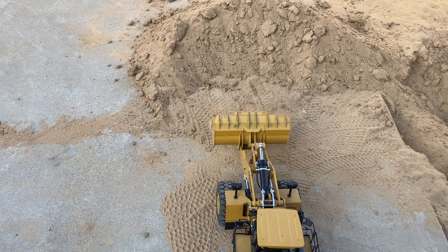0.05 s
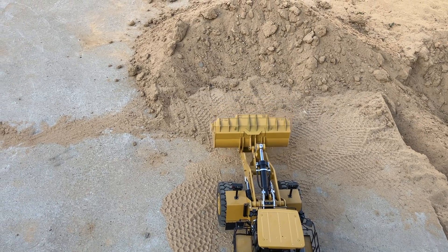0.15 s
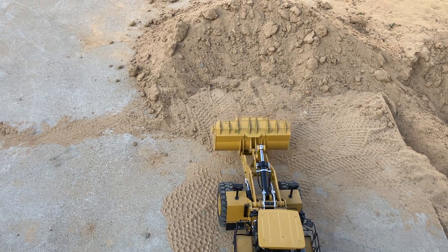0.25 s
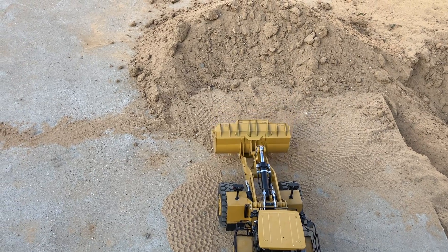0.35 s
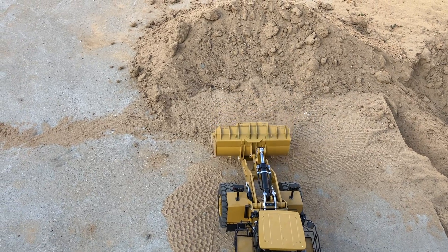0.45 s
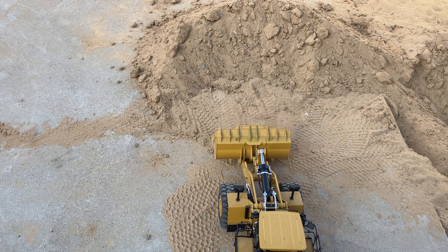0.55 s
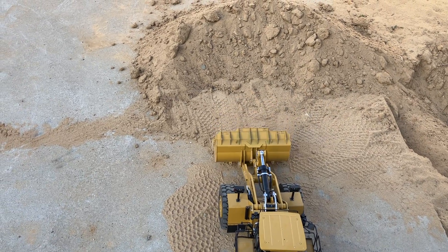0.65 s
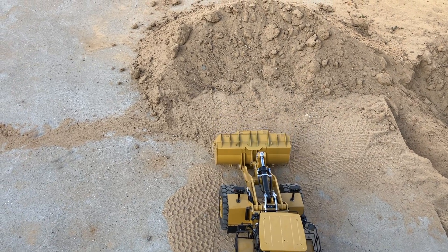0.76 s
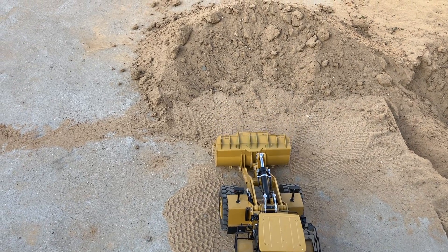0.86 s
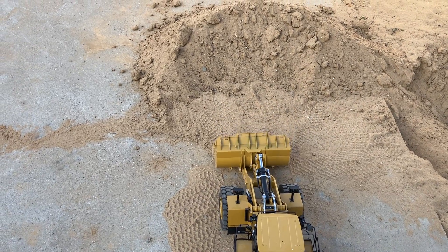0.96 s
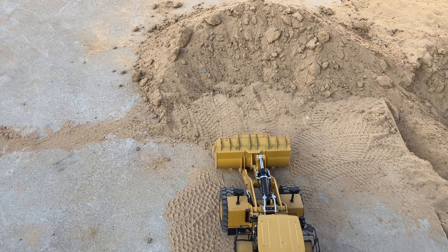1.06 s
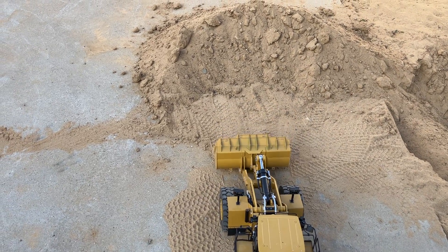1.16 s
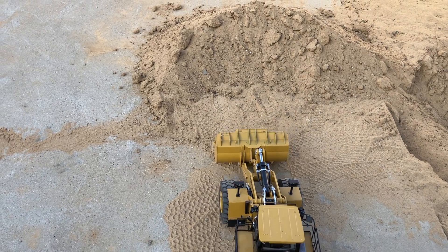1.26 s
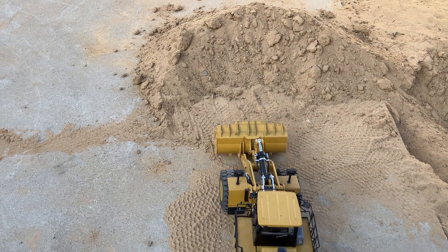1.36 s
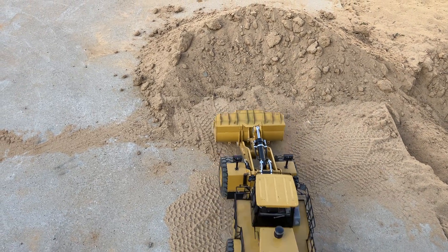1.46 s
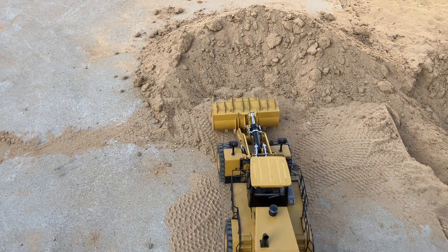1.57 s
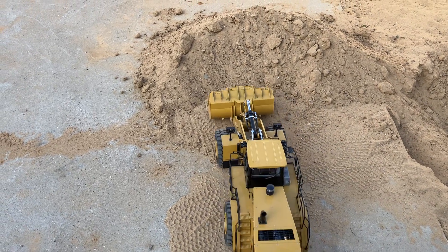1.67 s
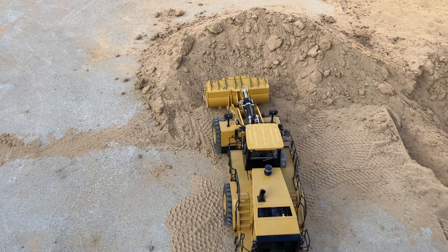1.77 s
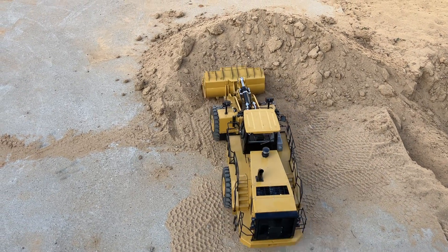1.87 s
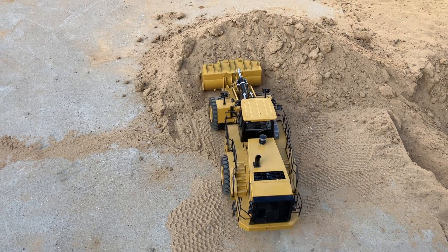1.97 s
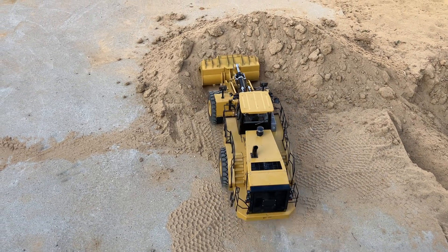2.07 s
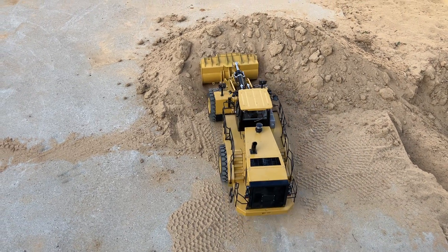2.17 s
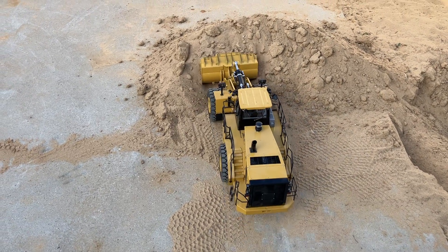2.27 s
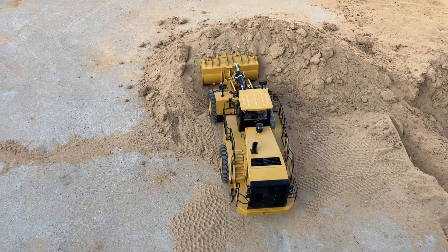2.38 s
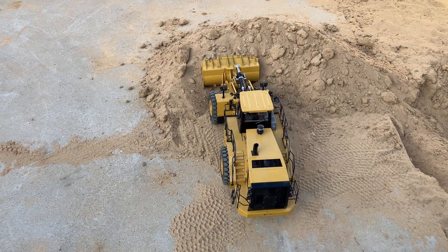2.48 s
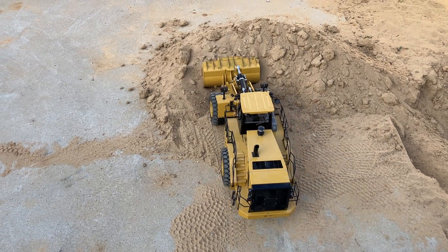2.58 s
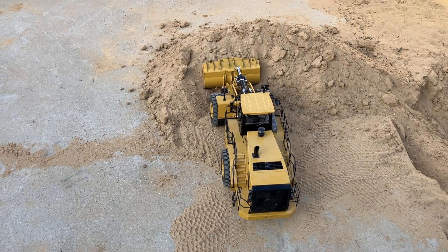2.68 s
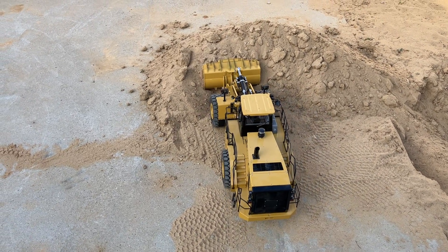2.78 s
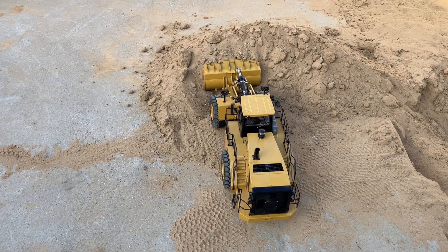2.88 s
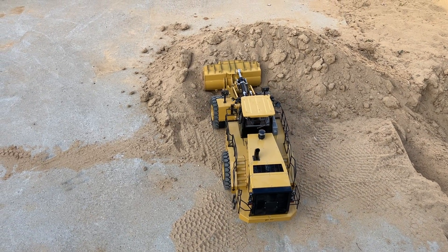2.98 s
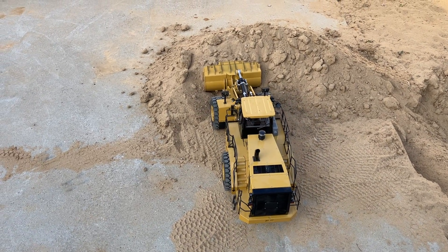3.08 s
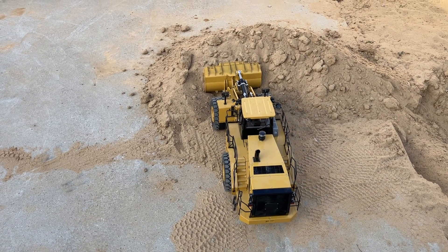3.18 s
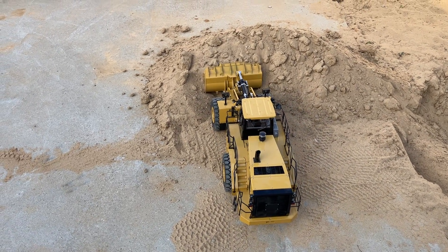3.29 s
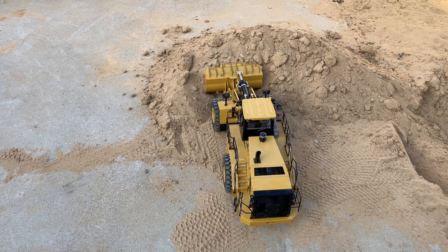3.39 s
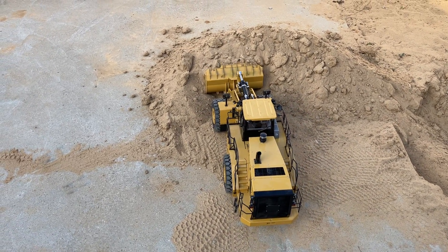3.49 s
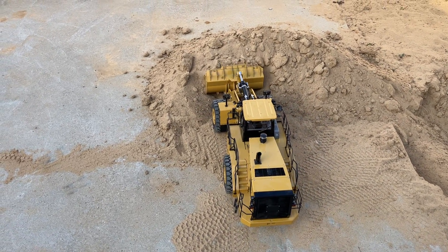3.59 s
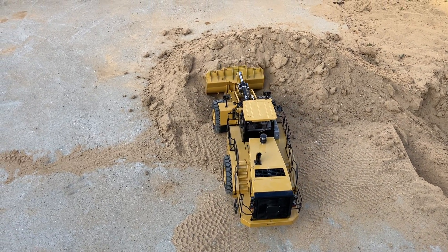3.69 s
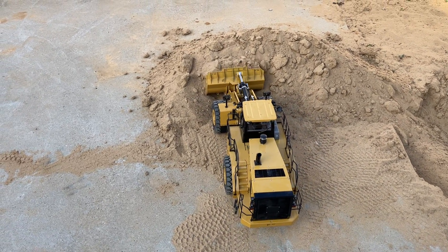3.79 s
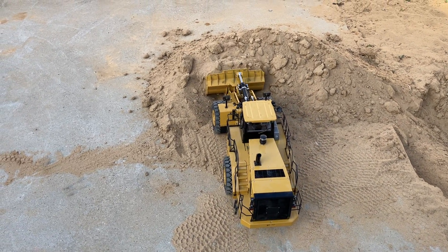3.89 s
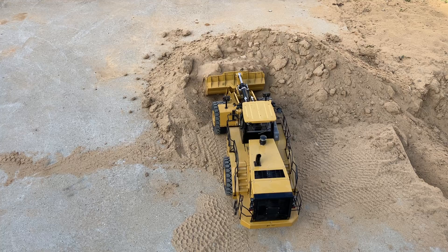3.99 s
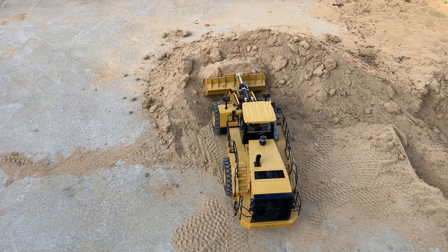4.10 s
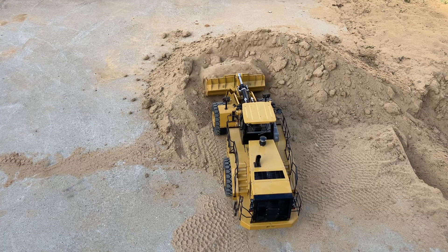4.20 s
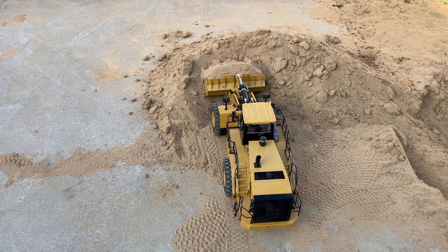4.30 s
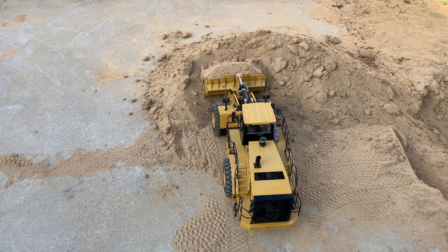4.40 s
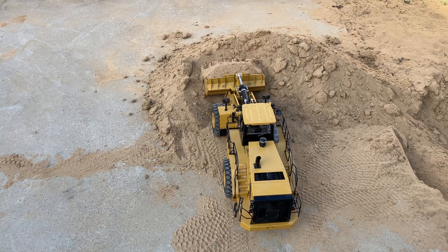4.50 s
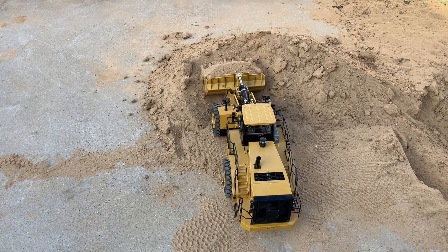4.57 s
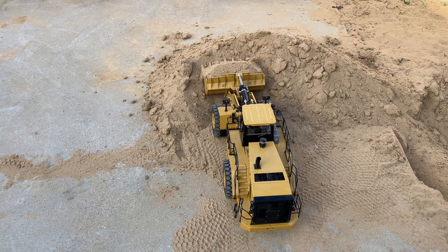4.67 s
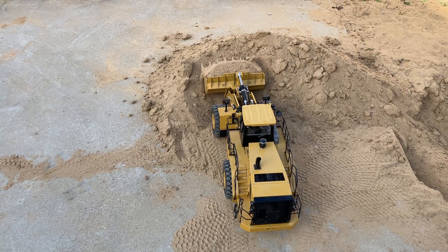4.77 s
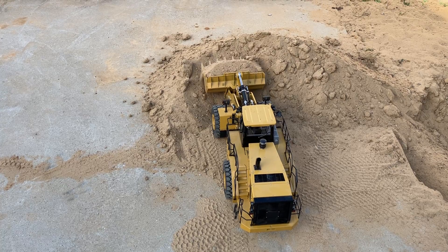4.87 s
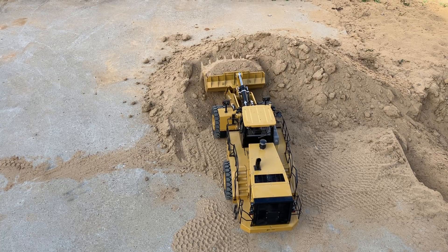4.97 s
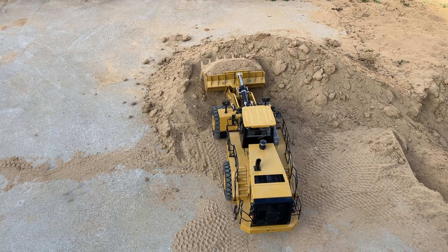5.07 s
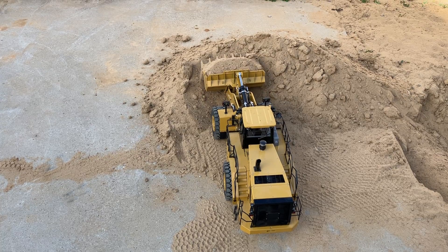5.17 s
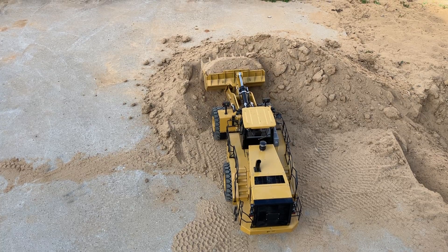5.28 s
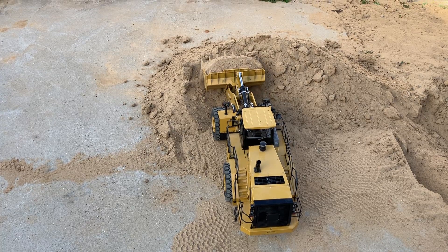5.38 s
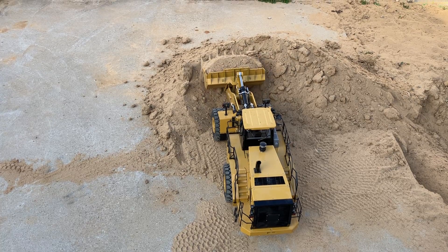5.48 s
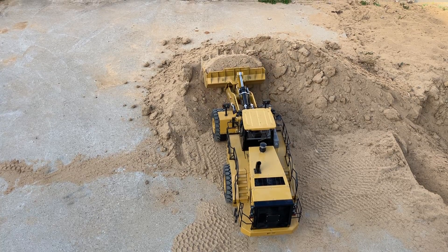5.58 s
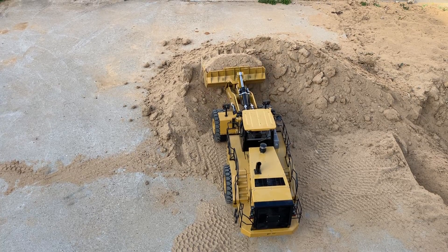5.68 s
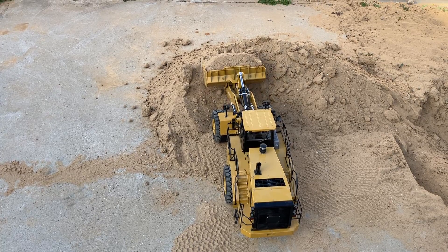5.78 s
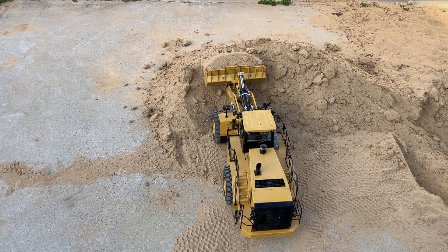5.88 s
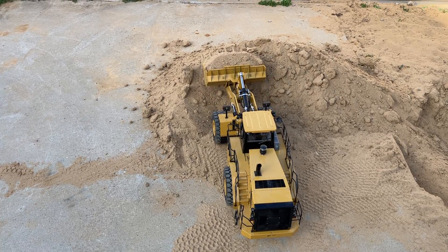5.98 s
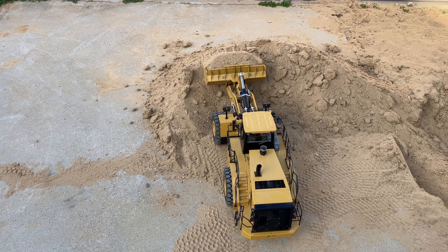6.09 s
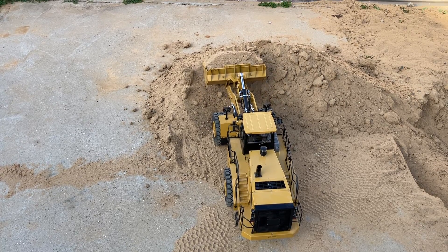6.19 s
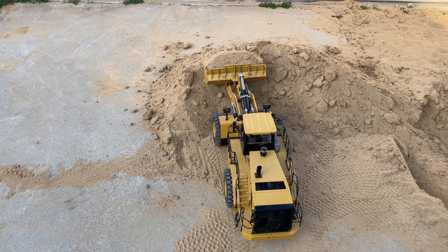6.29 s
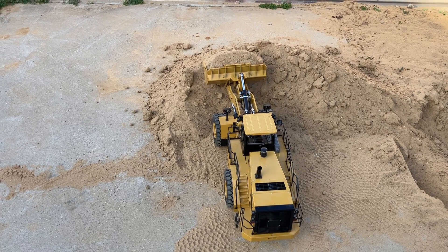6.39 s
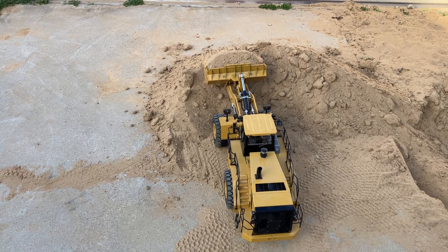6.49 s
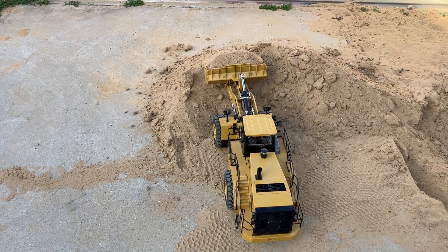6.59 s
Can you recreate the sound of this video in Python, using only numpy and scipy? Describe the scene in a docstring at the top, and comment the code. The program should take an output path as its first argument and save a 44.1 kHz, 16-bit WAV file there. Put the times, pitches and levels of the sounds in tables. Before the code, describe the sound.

A hand-held stereo microphone is close to a small electric loader outdoors. Its buzzy pump whine runs down; a tiny servo twitches. Then comes an abrupt loud burst of grinding gears, gritty tyres and bucket steel scraping and knocking on stones. Near quiet follows, with a servo's thin buzz and a click. The pump starts again, whines strongly, drops, recovers and slows at the end over far traffic rumble.

```python
"""On sandy concrete, close to a hand-held stereo microphone, a model wheel loader works.
Its hydraulic pump motor repeats a pattern of shaft orders through the chassis; it slows, stops, starts again.
The drive motor lurches forward on gear tones and noise, the bucket's steel rings and rasps over the ground,
a small servo whirs, gears click. Far off, shaped noise rumbles as traffic.
The treble differs in phase between left and right. Table levels are relative: filters and trims follow."""
import sys
import numpy as np
from scipy import signal
from scipy.fft import rfft, irfft, next_fast_len
from scipy.io import wavfile
from scipy.ndimage import uniform_filter1d, map_coordinates

SR = 44100
rng = np.random.default_rng(int(sys.argv[2]) if len(sys.argv) > 2 else 0)


def generate_wav(signal):
    """Clip the signal to [-1, 1] and save it as 16-bit WAV at the path in sys.argv[1]."""
    frames = np.transpose(np.atleast_2d(signal))
    scaled = np.clip(frames, -1, 1) * 32767
    pcm = np.round(scaled).astype(np.int16)
    wavfile.write(sys.argv[1], SR, pcm)


N = 293265

# seven magnet pairs, at 35, 42, 49 .. times the shaft speed: level/dB
MAGNET_LEVELS = [-75, -65, -54, -67, -63, -56.5, -68, -65, -61.5, -64.5, -70.5, -75, -62, -68.5, -67, -70.5,
                 -71, -70, -68.5, -97, -82, -84, -80, -74, -78, -71.5, -84]
# nineteen gear teeth, at 38, 57, 76 .. times the shaft speed: level/dB
TOOTH_LEVELS = [-62.5, -65.5, -62.5, -65, -63.5, -67, -87, -89, -81, -94, -89, -78, -89, -112, -74.5, -75.5,
                -77, -75]
# twelve stator slots beating against the magnets: multiple of shaft speed; level/dB
SLOT_ORDERS = [37, 47, 61, 74, 165, 230]
SLOT_LEVELS = [-49, -60, -50.5, -77, -65, -73]
# orders whose strength differs while running down without load: multiple of shaft speed
IDLE_ORDERS = [37, 42, 47, 49, 61, 119, 133, 165]


def revolution(change_db):
    """One turn of the shaft: magnet, tooth and slot orders over weak irregularities at every order."""
    orders, size = 600, 2 ** 14
    level = amp(-81 - .055 * np.arange(orders) + 3 * rng.standard_normal(orders))
    level[np.arange(len(MAGNET_LEVELS)) * 7 + 35] = amp(MAGNET_LEVELS)
    level[np.arange(len(TOOTH_LEVELS)) * 19 + 38] = amp(TOOTH_LEVELS)
    level[SLOT_ORDERS] = amp(SLOT_LEVELS)
    level[IDLE_ORDERS] *= amp(change_db)
    random_phase = np.exp(2j * np.pi * rng.random(orders))
    return irfft(level * random_phase, size) * size / np.sqrt(2)


# pump runs as the throttle stick sets them, one list a run: t/s, shaft speed f/Hz
PUMP_RUNS = [
    [(0, 21.3), (.23, 19.05), (.61, 16.48), (.9, 14.55), (1.08, 13.65)],
    [(2.91, 13.8), (2.97, 14.9), (3.06, 17.7), (3.328, 28.0), (3.69, 28.33), (4.028, 28.0), (4.17, 23.9),
     (4.25, 22.5), (4.38, 18.5), (4.505, 15.7), (4.69, 19.55), (5.32, 21.97), (5.67, 21.95), (5.85, 20.33),
     (6.08, 19.97), (6.27, 19.3), (6.42, 17.5), (6.63, 14.25), (6.65, 14.1)],
]
# change of the idle orders, one row a run: level/dB for each order
IDLE_CHANGES = [
    [-6, -6, 6, 7, 5, 0, 5, -8],
    [0, 0, 0, 0, 0, 0, 0, 0],
]
# one row a run: effort level/dB at cruise, its slope/(dB per Hz), treble level/dB, tick level/dB,
# sizzle level/dB, fade before the stop t/s
RUN_LOADS = [(-3, 0.16, -2, -56, -49.5, 0.14), (0.2, 0.7851, -0.36, -73, -51, .001)]
# chassis resonances around the pump: f/Hz, width f/Hz, level/dB
CHASSIS_MODES = [(843.6, 81, 12.5), (972.5, 213, 5.5), (1186, 130, -1.5), (1325, 160, -2), (1874, 28, 1),
                 (2013.6, 69.4, 15), (2067, 200, 6), (2610, 710, -0.5), (2942, 30, 11), (3520, 940, -3.5),
                 (4630, 530, 4), (5700, 1500, -29), (8690, 1410, 19.5), (9850, 960, 9)]
# oil hiss of the pump: f/Hz, level/dB
OIL_SPECTRUM = [(300, -23), (800, -14), (1100, 3.5), (1600, -11), (2000, -5), (3000, -10), (4500, -17.5),
                (6000, -25), (8200, -12.5), (10200, -4.5), (13000, -65)]
# switching sizzle of the speed controller: f/Hz, width f/Hz, level/dB
SIZZLE_MODES = [(8000, 600, -9), (10200, 350, -10), (12200, 300, -8), (14080, 500, -6), (15650, 350, 0),
                (13500, 5000, -16)]
# low drone while the pump runs down: t/s, level/dB
DRONE_LEVELS = [(0, -49.5), (.5, -53.5), (.9, -50.5), (1.1, -58)]
LOW_EDGE_HZ = 903  # the small chassis radiates little below this
INERTIA_S, CRUISE_HZ = .08, 21  # the rotor rounds speed changes; speed at which RUN_LOADS holds
TREBLE_LAGS = 0.62  # share of the effort that the treble does not follow
TICK_SWING_DB, TICK_DB_PER_HZ = 5, 0.84
OIL_DB, FADE_DB = -52, 26


def pump():
    """The pattern of one turn repeats at the shaft speed; oil hiss, tick and sizzle ride on it."""
    chassis = lambda f: modes(CHASSIS_MODES)(f) / np.sqrt(1 + (LOW_EDGE_HZ / (f + 1)) ** 24)
    drone_db, droning = curves(DRONE_LEVELS)
    drone = noise(modes([(488, 22, 0), (684, 13, 0.00038), (887, 270, 0)]))
    out = droning * amp(drone_db) * drone
    oil_colour = lambda f: amp(along(OIL_SPECTRUM, f)) * (chassis(f) / (1 + (f / 6000) ** 6)) ** 0.3
    for rows, change_db, load in zip(PUMP_RUNS, IDLE_CHANGES, RUN_LOADS):
        load_db, per_hz, treble_db, tick_db, sizzle_db, fade_s = load
        stick, on = curves(rows)
        hz = uniform_filter1d(stick, size=round(INERTIA_S * SR), mode="nearest")
        over_cruise = hz - CRUISE_HZ
        speed_db = per_hz * over_cruise
        effort = amp(load_db + speed_db)
        time_left = rows[-1][0] - np.arange(N) / SR
        fade_db = -FADE_DB * np.clip(1 - time_left / fade_s, 0, 1)

        angle = turns(hz) % 1
        pattern = revolution(change_db)
        runout = 1 + .15 * np.cos(2 * np.pi * angle)  # an off-centre shaft swells once a turn
        whine = np.interp(angle * len(pattern), np.arange(len(pattern)), pattern)
        whine = whine * runout * amp(1.57 * wobble(14))
        oil = amp(OIL_DB + 0.04 * over_cruise) * runout * noise(oil_colour)
        body = filtered(effort * whine, chassis) + effort * oil
        low = filtered(body, lambda f: 1 / (1 + (f / 1600) ** 8))
        treble = amp(treble_db - TREBLE_LAGS * speed_db) * (body - low)

        tick_db = tick_db + TICK_DB_PER_HZ * over_cruise + TICK_SWING_DB * np.cos(2 * np.pi * angle)
        tick = amp(tick_db + 2.0 * wobble(22)) * noise(modes([(1510, 480, 0)]))
        sizzle_db = sizzle_db + .5 * (speed_db + fade_db) + 0.49 * np.cos(6 * np.pi * angle)
        sizzle = amp(sizzle_db + 1.84 * wobble(30)) * noise(modes(SIZZLE_MODES))
        out += on * (amp(fade_db) * (low + tick) + treble + sizzle)
    return out


# drive motor: t/s, gear tone f/Hz, tone level/dB
DRIVE_RUN = [(1.25, 270, -55), (1.38, 321.4, -33), (1.5, 385, -37.5), (1.62, 420.8, -39.5),
             (1.75, 431.8, -44), (1.86, 427.5, -41), (1.99, 387.8, -40.5), (2.05, 359.8, -45),
             (2.12, 343.4, -47.5), (2.2, 297, -47.5), (2.3, 232, -52)]
# gear tones: multiple of the gear tone frequency; level/dB
DRIVE_ORDERS = [1, 3, 4.66, 6, 7, 8.33, 9.32]
DRIVE_LEVELS = [-9, 0, -4, -8, -11, -6, -2]
# housing around the drive gears: f/Hz, width f/Hz, level/dB
AXLE_MODES = [(393, 470, 0), (1140, 320, 4), (2076, 270, 5), (3280, 520, -1)]
# gears and tyres on grit: t/s, level/dB
ROAR_LEVELS = [(1.13, -55.5), (1.206, -34.5), (1.5, -38), (2.158, -35.5), (2.296, -46.5), (2.345, -78)]
# colour of that roar: f/Hz, level/dB
ROAR_SPECTRUM = [(150, -15), (300, -2), (600, -1.5), (1200, 5), (1600, 1), (2000, 2), (3300, 0), (6000, -9),
                 (9000, -3), (10500, 2), (13500, -13.5), (15700, -3)]
# squeals as the drive takes up: start t/s, end t/s, start f/Hz, end f/Hz, level/dB
SQUEALS = [(1.096, 1.116, 980, 1030, -38), (1.11, 1.126, 1020, 1070, -40), (1.108, 1.185, 1010, 1330, -31),
           (1.155, 1.215, 1250, 1430, -41), (1.115, 1.185, 930, 690, -42), (1.17, 1.235, 980, 1230, -32)]
# the bucket edge strikes larger stones: t/s, strike level/dB, surge of the roar level/dB
STONE_BLOWS = [(1.211, -9.5, -31.5), (1.229, -12, -43.5), (1.316, -14.5, -30), (1.403, -11, -27.5),
               (1.454, 2, -34), (1.569, -5.5, -40.5)]
JOLT_RISE, JOLT_FALL = 2400, 200  # the roar surges at each blow (dB per s)


def drive():
    """Wavering gear tones through the axle housing, over the roar of gears and tyres, with squeals."""
    hz, db, on = curves(DRIVE_RUN)
    angle = turns(hz * (1 + 0.00595 * wobble(40)))
    tones = sum(amp(level + 3.7 * wobble(18)) * np.sin(2 * np.pi * order * angle)
                for order, level in zip(DRIVE_ORDERS, DRIVE_LEVELS))
    roar_db, rolling = curves(ROAR_LEVELS)
    jolts = [amp(surge_db) * burst(s, s, JOLT_RISE, JOLT_FALL) for s, _, surge_db in STONE_BLOWS]
    unevenness = amp(4 + 0.83 * wobble(60) + 0.85 * wobble(400))
    roar_noise = noise(lambda f: amp(along(ROAR_SPECTRUM, f)))
    roar = together([amp(roar_db)] + jolts) * unevenness * roar_noise
    out = filtered(on * amp(db + 4.0) * tones, modes(AXLE_MODES)) + rolling * roar
    for start, end, start_hz, end_hz, level in SQUEALS:
        middle = ((start + end) / 2, (start_hz + end_hz) / 2, 0)
        pitch, swell_db, _ = curves([(start, start_hz, -30), middle, (end, end_hz, -30)])
        swell = amp(level + swell_db + 1.5 * wobble(80)) * (swell_db > -30)
        out += swell * np.sin(2 * np.pi * turns(pitch))
    return out


# bucket edge drags on the ground: start t/s, end t/s, ring level/dB, rasp level/dB
SCRAPES = [(1.204, 1.233, -23, -23), (1.27, 1.46, -29, -23.5)]
# ringing of the steel bucket: f/Hz, width f/Hz, level/dB
BUCKET_MODES = [(285, 60, -12), (566.6, 8.5, 7.5), (909, 32, 5.5), (994, 14.4, 7.5), (1536, 91, -8.5),
                (2183, 49, -2), (2610, 110, -10.5), (2930, 78, -6.5), (3180, 170, -16.5), (4075, 41, -4),
                (4500, 170, -15.5), (4870, 36, -10)]
# colour of the rasp: f/Hz, level/dB
RASP_SPECTRUM = [(200, -6), (400, 4), (1500, -38), (3300, 11.5), (5500, -3), (8500, 8.5), (10500, 0),
                 (13500, 4), (15700, 6.5)]
SCRAPE_RISE, SCRAPE_FALL, RING_GROWS, RASP_FADES = 1100, 750, 59.5, 13  # (dB per s)
GRIT_SLOW_DB, GRIT_FAST_DB = 2.8, 4.2  # how unevenly the grit catches


def bucket():
    """Grit catches the edge in uneven bursts and stones strike it; the steel rings and rasps."""
    ring = together(amp(ring_db) * burst(a, b, SCRAPE_RISE, SCRAPE_FALL, RING_GROWS)
                    for a, b, ring_db, _ in SCRAPES)
    edge = together(amp(rasp_db) * burst(a, b, SCRAPE_RISE, SCRAPE_FALL, -RASP_FADES)
                    for a, b, _, rasp_db in SCRAPES)
    catching = amp(GRIT_SLOW_DB * wobble(70) + GRIT_FAST_DB * wobble(500))
    grit = unit(catching * rng.standard_normal(N))
    rub = amp(14) * ring * grit
    t = np.arange(1200) / SR
    for s, db, _ in STONE_BLOWS:
        strike = amp(db + 6.5 - 60 * t / 0.017) * rng.standard_normal(len(t))
        rub[round(s * SR):][:len(t)] += strike

    def steel(f):
        """Damped resonators with alternating signs."""
        return sum((-1) ** k * amp(db) * 1j * f * width / (hz * hz - f * f + 1j * f * width)
                   for k, (hz, width, db) in enumerate(BUCKET_MODES))

    rasp = unit(filtered(grit, lambda f: amp(along(RASP_SPECTRUM, f))))
    return filtered(rub, steel) + edge * rasp


# servo moves: start t/s, end t/s, level/dB
SERVO_MOVES = [(0.812, 0.891, -45), (0.963, 0.957, -55), (0.989, 1.056, -56), (2.498, 2.53, -53),
               (2.525, 2.714, -47.5), (2.744, 2.808, -55.5), (4.138, 4.2, -54), (4.21, 4.257, -48),
               (4.3, 4.37, -56.5), (4.378, 4.458, -51.5)]
# servo case: f/Hz, width f/Hz, level/dB
SERVO_CASE_MODES = [(3600, 450, 1), (4600, 700, -3), (6200, 2200, -5), (8100, 1200, -3), (10000, 1500, -3),
                    (11700, 900, 3), (14300, 2500, -6)]
# hunting around its target: start t/s, end t/s, gear tone f/Hz, its swing f/Hz, swing rate f/Hz,
# a top of the swing t/s
SERVO_HUNT = (2.5, 2.68, 900, 30, 20.5, 2.545)
SERVO_RISE, SERVO_FALL, HUNT_FADES = 850, 420, 140  # (dB per s)
HUNT_SHARE = .33  # tone share 0-1 at its strongest, on every second swing


def servo():
    """High harmonics of a swinging gear tone mixed with hiss, throbbing once per turn of the tiny motor."""
    start, end, hz, swing, rate, top = SERVO_HUNT
    since_top = np.arange(N) / SR - top
    tone_hz = hz + swing * np.cos(2 * np.pi * rate * since_top)
    angle = turns(tone_hz * (1 + 0.015 * wobble(80)))
    buzz = unit(sum(amp(-.8 * k + 4 * wobble(70)) * np.cos(2 * np.pi * k * angle) for k in range(4, 14)))
    throb = amp(3 * np.cos(2 * np.pi * angle / 12))  # twelve gear-tone cycles a turn
    # the tone stands out only while the servo hunts
    every_second_swing = np.cos(np.pi * rate / 2 * since_top) ** 4
    share = HUNT_SHARE * every_second_swing * burst(start, end, SERVO_RISE, HUNT_FADES)
    source = np.sqrt(share) * buzz + np.sqrt(1 - share) * rng.standard_normal(N)
    moves = together(amp(db) * burst(a, b, SERVO_RISE, SERVO_FALL) for a, b, db in SERVO_MOVES)
    return amp(0.5) * moves * throb * unit(filtered(source, modes(SERVO_CASE_MODES)))


# gears take up their slack: t/s, starting level/dB, 60 dB decay t/s
GEAR_CLICKS = [(2.4654, -50, 0.034), (2.9094, -34, 0.036), (2.989, -52, 0.023)]


def clicks():
    """Short bright decaying noise bursts that also knock the chassis."""
    out = np.zeros(N + SR)
    t = np.arange(SR // 5) / SR
    for s, db, t60 in GEAR_CLICKS:
        out[round(s * SR):][:len(t)] += amp(db - 8.0 - 60 * t / t60) * rng.standard_normal(len(t))
    bright = out[:N]
    return bright + amp(12) * filtered(bright, modes(CHASSIS_MODES[:10]))


def ground(x):
    """Scattered reflections from ground and sand heap: decaying noise tails, different left and right."""
    t = np.arange(SR // 4) / SR
    tail = rng.standard_normal((2, len(t))) * amp(-60 * t / 0.19)
    wet = signal.fftconvolve(x[None], tail / np.linalg.norm(tail[0]), axes=1)[:, :N]
    return filtered(wet, lambda hz: 1 / (1 + (hz / 6000) ** 6))


# colour of the far traffic: f/Hz, level/dB
TRAFFIC_SPECTRUM = [(25, -31), (40, -14.5), (60, -2), (90, 0), (125, -6), (170, -15), (300, -23.5),
                    (600, -31.5), (1200, -28), (2000, -36.5), (4000, -39.5), (7000, -49), (16000, -62)]
# traffic left and right: f/Hz, likeness (correlation, 1 = alike)
TRAFFIC_LIKENESS = [(30, .97), (60, 0.99), (140, 0.87), (450, 0.45), (1000, 0.094), (4000, 0.71),
                    (8000, 0.13)]


def traffic():
    """Far rumble of slowly wavering noise, partly alike left and right."""
    def mid_side(hz):
        turn = np.arccos(np.clip(along(TRAFFIC_LIKENESS, hz), -1, 1)) / 2
        return amp(along(TRAFFIC_SPECTRUM, hz)) * [np.cos(turn), np.sin(turn)]

    mid, side = filtered(rng.standard_normal((2, N)), mid_side)
    return amp(-42.5 + 0.33 * wobble(1.885)) * unit(np.array([mid + side, mid - side]))


def amp(db):
    """Decibels to amplitude."""
    return 10 ** (np.asarray(db) / 20)


def unit(x):
    """Scale to rms 1."""
    return x / np.sqrt(np.mean(x ** 2) + 1e-20)


def along(points, hz):
    """Read (f/Hz, value) points on a log frequency axis."""
    f, v = np.transpose(points)
    return np.interp(np.log(hz + 1), np.log(f + 1), v)


def curves(rows):
    """One value per sample for each column after the time, and a gate that is open inside the table."""
    s, *cols = np.transpose(rows)
    t = np.arange(N) / SR
    gate = uniform_filter1d(1. * (t > s[0]) * (t < s[-1]), size=300)
    return [np.interp(t, s, c) for c in cols] + [gate]


def wobble(rate):
    """A smooth random curve, rate knots a second."""
    knots = rng.standard_normal(int(N * rate / SR) + 4)
    return map_coordinates(knots, [np.arange(N) * rate / SR])


def filtered(x, response):
    """Filter x by a response that is a function of frequency in Hz."""
    m = next_fast_len(N + SR // 2)
    return irfft(rfft(x, m) * response(np.fft.rfftfreq(m, 1 / SR)), m)[..., :N]


def modes(table):
    """Gain of steep-sided resonances whose powers add."""
    return lambda f: np.sqrt(sum((amp(db) / (1 + (2 * (f - hz) / width) ** 2)) ** 2
                                 for hz, width, db in table))


def noise(response):
    """Coloured noise of rms 1."""
    return unit(filtered(rng.standard_normal(N), response))


def turns(hz):
    """Cycles completed at a varying frequency."""
    return np.cumsum(hz) / SR


def burst(start, end, rise, fall, grows=0):
    """Gain that rises, holds or drifts, and falls on straight dB slopes."""
    t = np.arange(N) / SR
    drift_db = grows * np.clip(t - start, 0, end - start)
    rise_db = rise * np.clip(start - t, 0, 1)
    fall_db = fall * np.clip(t - end, 0, 1)
    return amp(np.maximum(drift_db - rise_db - fall_db, -120))


def together(gains):
    """Combine gains so that their powers add."""
    return np.sqrt(sum(g ** 2 for g in gains))


def scene():
    """The loader slightly stronger on the left, its reflections, and the traffic far behind."""
    moving = drive() + bucket()
    still = pump() + servo() + clicks()
    direct = moving * amp([[.4], [-.4]]) + still * amp([[.1], [-.1]])  # left, right (dB)
    reflected = ground(amp(-5.5) * moving + amp(-15) * still)
    return direct + reflected + traffic()


# left-right phase difference in the treble, in steps: f/Hz, half turns
TREBLE_PHASE = [(7400, 0), (8850, 1), (9600, 1), (11000, 2), (11700, 2), (13100, 3), (13850, 3), (15600, 4)]
TOP_HZ = 15820  # upper limit of the sound's band


def record(dry):
    """Half of the phase difference is given to each channel; the sound's band ends at TOP_HZ."""
    half_phase = lambda hz: np.interp(hz, *np.transpose(TREBLE_PHASE)) * np.pi / 2  # radians
    return filtered(dry, lambda hz: np.exp(1j * half_phase(hz) * [[-1], [1]]) * (hz < TOP_HZ))


dry = scene()
out = record(dry)
generate_wav(out)
```